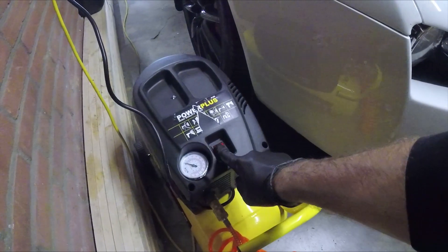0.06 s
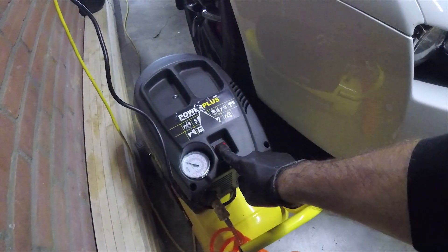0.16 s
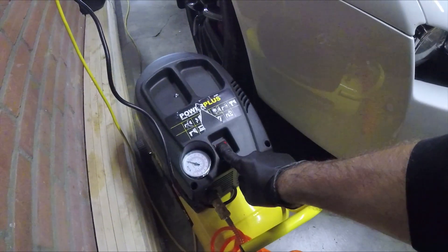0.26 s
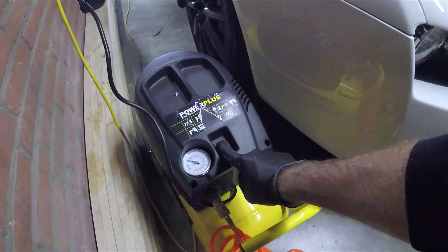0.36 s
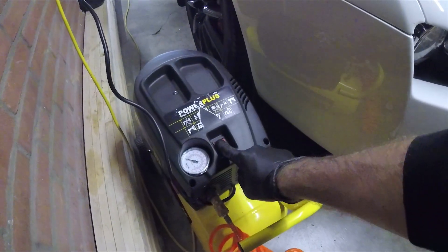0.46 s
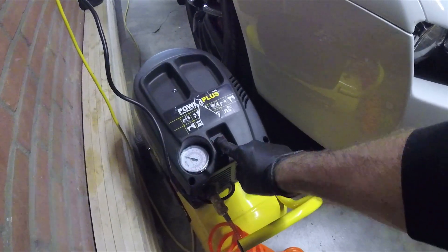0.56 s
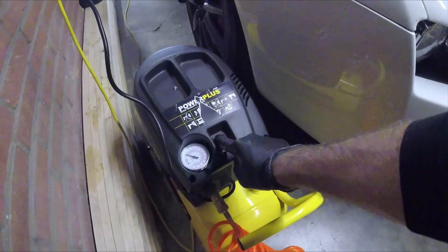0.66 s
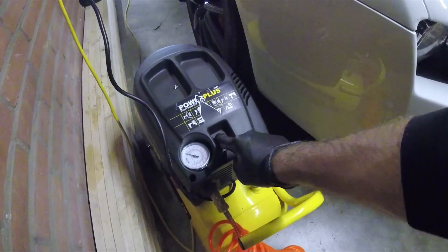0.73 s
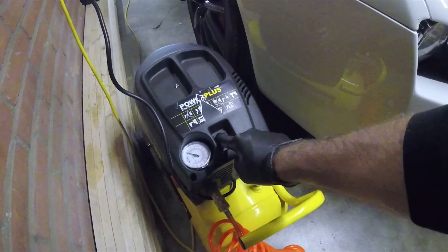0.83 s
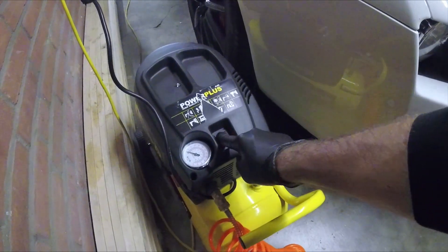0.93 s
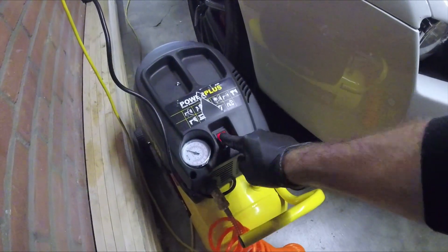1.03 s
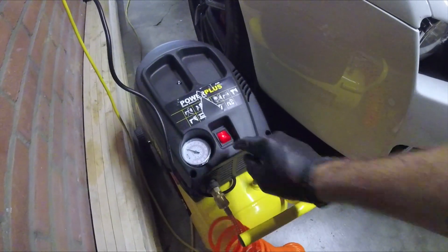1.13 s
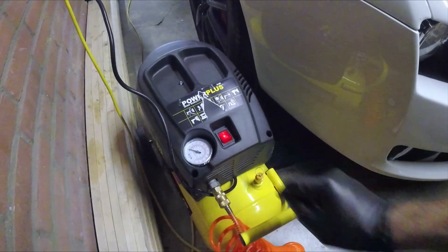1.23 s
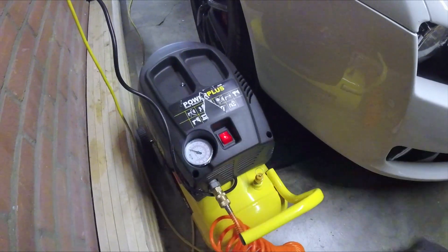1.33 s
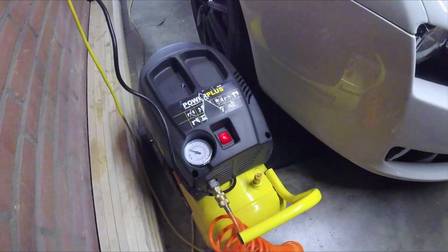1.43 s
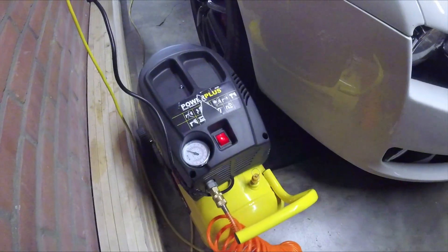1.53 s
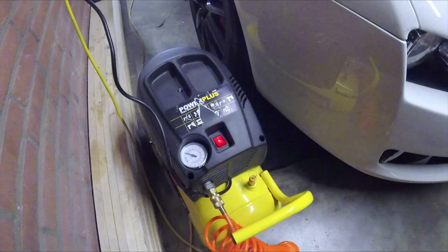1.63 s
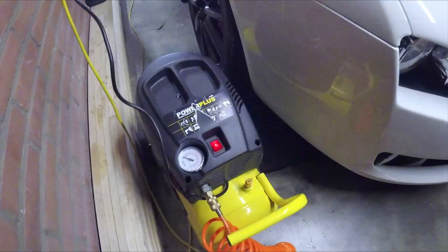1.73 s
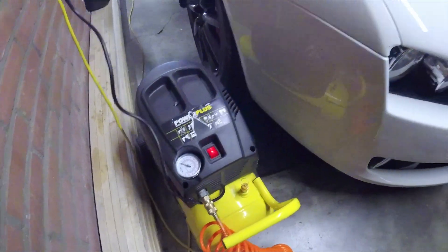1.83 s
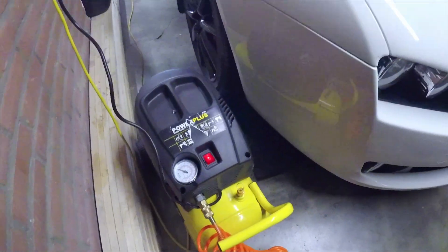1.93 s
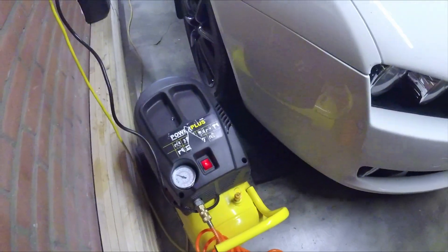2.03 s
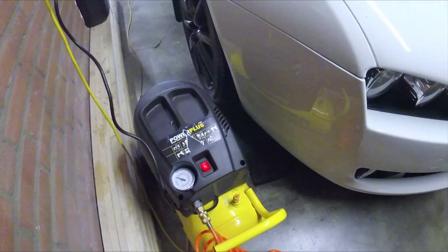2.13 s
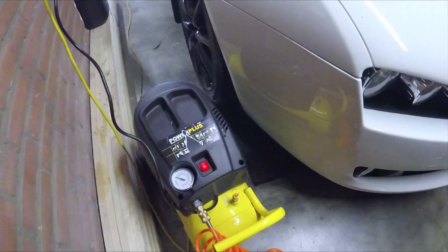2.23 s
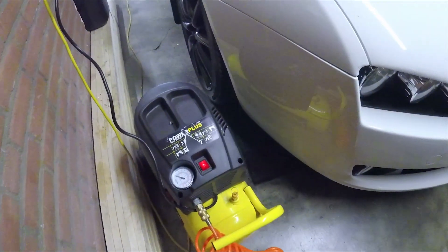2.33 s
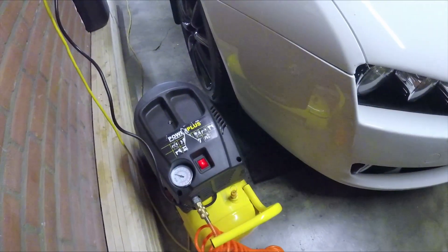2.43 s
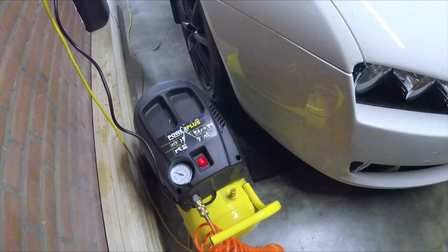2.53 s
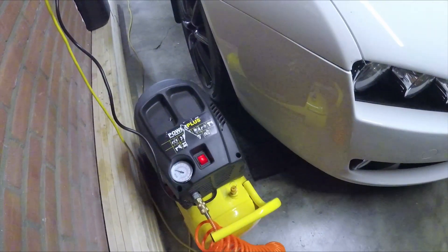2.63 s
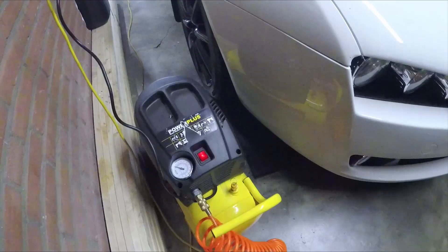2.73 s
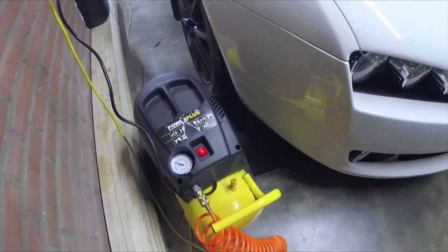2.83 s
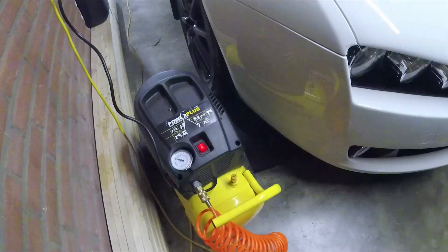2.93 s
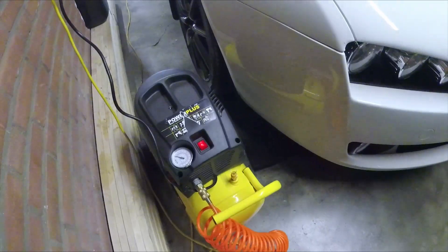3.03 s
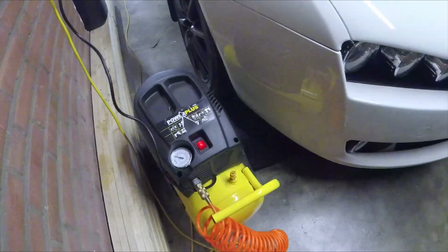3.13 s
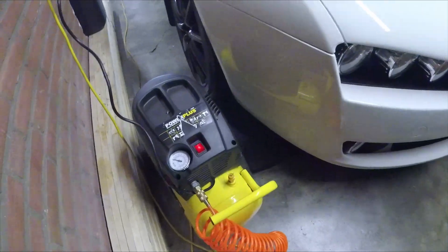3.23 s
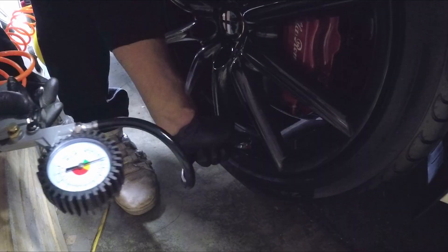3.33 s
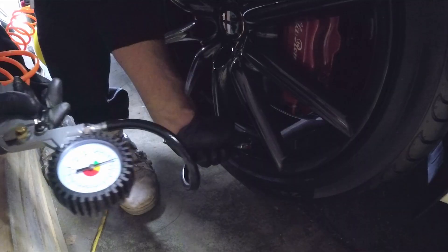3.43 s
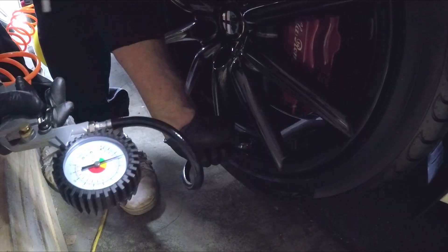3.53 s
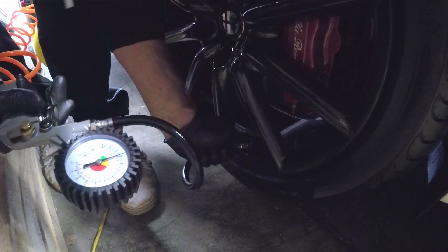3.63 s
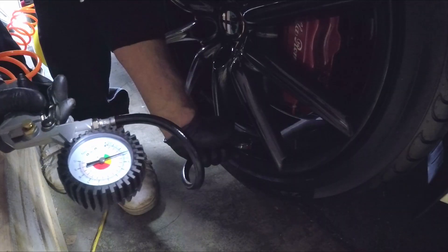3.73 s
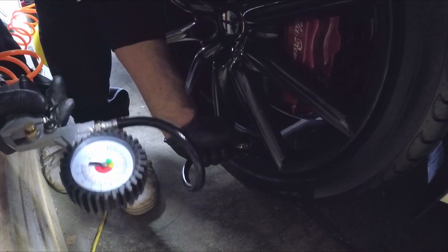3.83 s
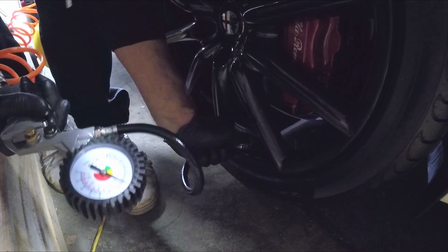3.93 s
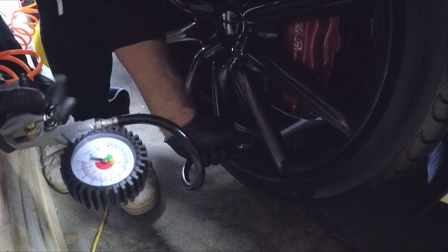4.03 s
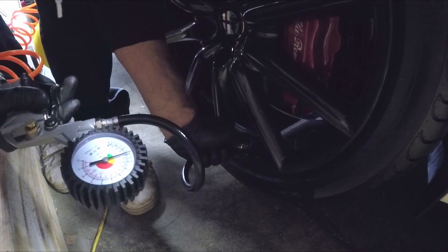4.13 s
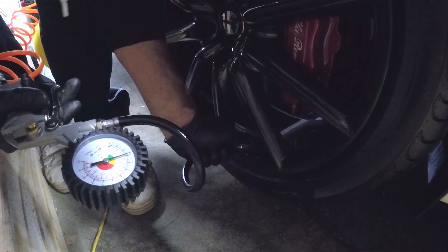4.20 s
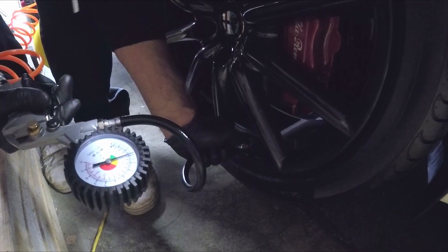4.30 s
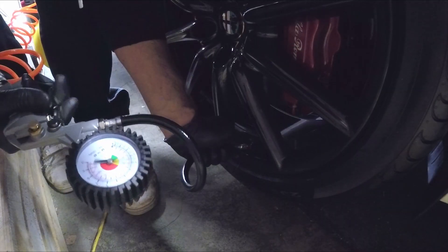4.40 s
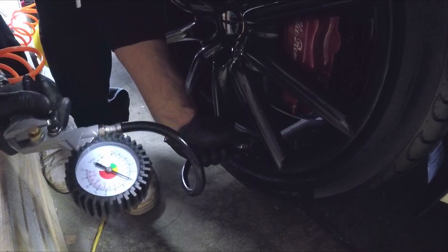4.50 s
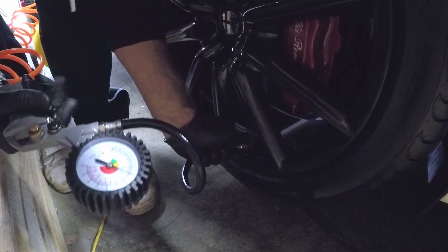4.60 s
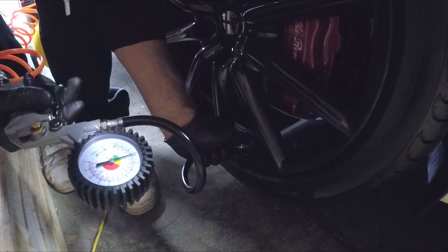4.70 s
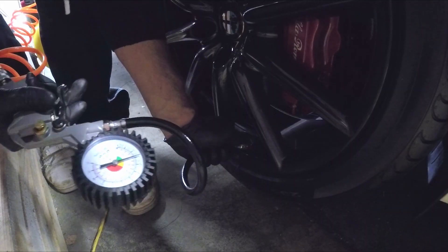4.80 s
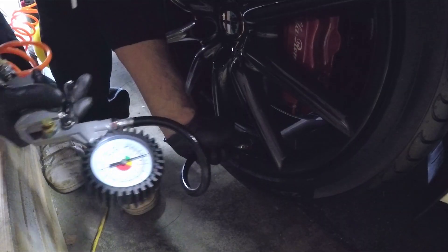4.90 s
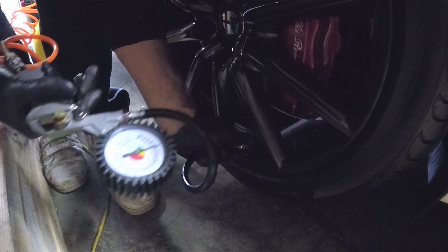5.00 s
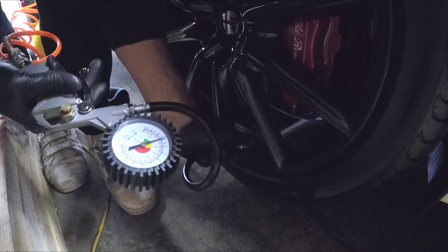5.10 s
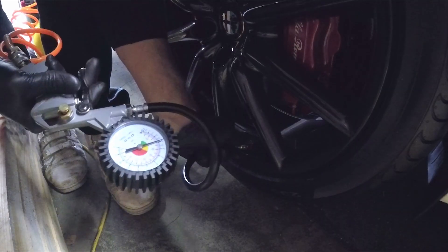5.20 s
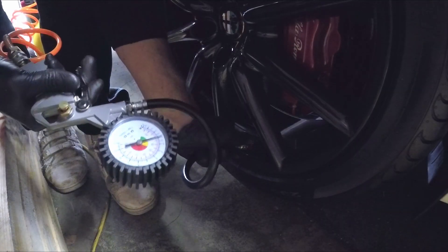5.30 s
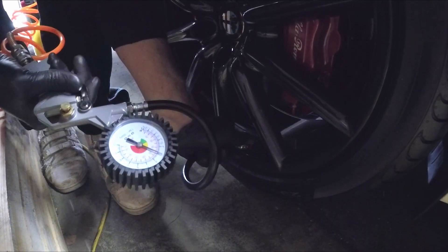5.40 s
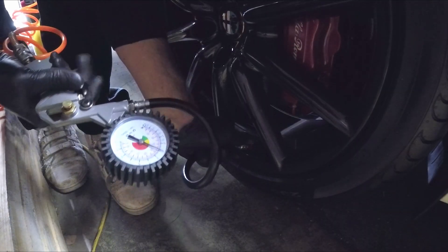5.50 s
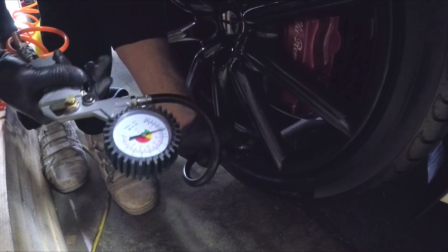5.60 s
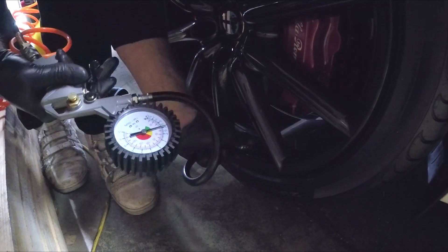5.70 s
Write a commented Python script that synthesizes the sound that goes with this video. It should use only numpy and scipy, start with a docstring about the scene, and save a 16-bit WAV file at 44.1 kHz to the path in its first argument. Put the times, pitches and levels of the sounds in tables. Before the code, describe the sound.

A quiet garage, heard from close up. Faint clicks come at about 0.2 and 0.4 seconds, then a sharp switch click at 0.55. A small piston air compressor spins up at once with a brief crackle, a chirp and an uneven rattle. By 1 second it settles into a loud, steady, buzzing drone with rapid thumping, whirring gears, rushing fan air and a thin, very high squeal. At about 3.4 seconds it cuts off abruptly, without winding down, leaving faint room tone. At 3.8 a tyre inflator gives a sharp click and a dull knock. Three short hisses of air go into the tyre, at about 3.8, 4.4 and 5.3 seconds, each lasting roughly a quarter of a second. They are much quieter than the compressor, bright and slightly ringing, with light knocks. The last two end in a faint whistle, and a soft handling rumble closes the sound.

```python
"""A switch clicks in a quiet garage and a small piston air compressor spins up: the piston thumps, the
intake reed flutters on each suction stroke, the outlet valve knocks and squeals, gears and fan buzz.
The scene changes abruptly to the wheel of a car, where an inflator knocks, clicks and lets three short
blasts of air into the tyre. The jet hisses at the valve and sets the tyre's cavity ringing."""
import sys
import numpy as np
from scipy import signal
from scipy.fft import rfft, irfft
from scipy.io import wavfile

SR = 44100
rng = np.random.default_rng(int(sys.argv[2]) if len(sys.argv) > 2 else 0)


def digitize_waveform(pressure):
    """Quantize a signal to 16-bit integers and store it at the path in sys.argv[1].

    Rows of a 2-D input are taken as channels; values are limited to [-1, 1].
    """
    field = np.atleast_2d(pressure).T
    bounded = np.clip(field, -1, 1)
    quanta = np.round(bounded * 32767).astype(np.int16)
    wavfile.write(sys.argv[1], SR, quanta)


N = 253575
TIME = np.arange(N) / SR
POWER_S, START_S, CHANGE_S = .553, .603, 3.366  # power comes on, crank breaks free, cut to the wheel
LOAD_S, LOAD_WIDTH_S = .85, .1  # the piston takes up its load: middle, half length
TOP_SPEED = 65.175  # crank turns per second


def from_db(db):
    """Decibels to gain."""
    return 10 ** (np.asarray(db) / 20)


def unit_rms(x):
    """Scale to rms 1."""
    return x / np.sqrt(np.mean(x ** 2) + 1e-20)


def swell(s, width):
    """A smooth hump of height 1 around a moment."""
    return np.exp(-((TIME - s) / width) ** 2)


def drift(rate_hz):
    """A smooth random wander, rms 1."""
    slow = signal.sosfilt(signal.butter(2, rate_hz, fs=SR, output="sos"), rng.standard_normal(N + SR))
    return unit_rms(slow[SR:])


def noise(spectrum):
    """Steady noise with the given power per Hz."""
    hz, level_db = np.transpose(spectrum)
    bins = np.maximum(np.arange(N // 2 + 1) * SR / N, 1)
    gain = from_db(np.interp(np.log(bins), np.log(hz), level_db))
    return irfft(rfft(rng.standard_normal(N)) * gain, N) * np.sqrt(SR / 2)


def ring(x, hz, t60):
    """One mode: a unit click sets a sine of height 1 ringing."""
    decay, step = from_db(-60 / (t60 * SR)), 2 * np.pi * hz / SR
    return signal.lfilter([0, np.sin(step)], [1, -2 * decay * np.cos(step), decay * decay], x + 1e-18)


def narrow_noise(hz, width_hz):
    """Turbulence in one resonance, rms 1."""
    return unit_rms(ring(rng.standard_normal(N), hz, np.log(1000) / (np.pi * width_hz)))


def dying_noise(age, t60):
    """White noise that dies away from age 0."""
    return rng.standard_normal(len(age)) * (age >= 0) * np.exp(-np.log(1000) * np.abs(age) / t60)


def hollow(x, t60, wet):
    """A share of the sound rings on in the dense modes of a closed space."""
    tail = dying_noise(TIME[:SR // 2], t60)
    reverb = signal.fftconvolve(x, tail / np.linalg.norm(tail))[:N]
    return np.sqrt(1 - wet) * x + np.sqrt(wet) * reverb


def gate(turns, opens, length, edge):
    """1 while a valve is open; all arguments in turns of the crank."""
    into = (turns - opens) % 1
    return np.clip(np.minimum(into, length - into) / edge, 0, 1)


def crank_tones(turns, harmonics, peak_at, scatter, smear):
    """Harmonics that crest near one crank angle; the housing smears the crest and each phase wanders."""
    middle = round(harmonics[len(harmonics) // 2][0])
    out = 0
    for k, level_db in harmonics:
        phase = 2 * np.pi * k * (turns - peak_at) - smear * (k - middle) ** 2
        out += np.sqrt(2) * from_db(level_db) * np.cos(phase + scatter * drift(12))
    return out


# Room tone by the compressor (frequency [Hz], level [dB per Hz])
GARAGE_TONE = [(20, -70), (50, -80), (95, -88.5), (150, -103), (300, -110), (700, -117), (3000, -121),
               (8000, -127), (14000, -133)]
def garage_ambience():
    """A steady, dark bed of noise."""
    return noise(GARAGE_TONE)


# Room tone at the wheel (frequency [Hz], level [dB per Hz])
WHEEL_TONE = [(100, -104), (300, -108), (1200, -111), (5000, -118), (14000, -121)]
# Handling rumble at rest (frequency [Hz], level [dB per Hz])
RUMBLE = [(20, -87), (90, -95.5), (220, -105), (600, -122), (2000, -150)]
def wheel_ambience():
    """Faint air over a low rumble that swells once as the inflator is moved."""
    rumble_db = 9.5 * swell(5.57, width=.099)
    return noise(WHEEL_TONE) + from_db(rumble_db) * noise(RUMBLE)


# Switch pings; knocks of housing, hose and gauge (time [s], pitch [Hz], level [dB], t60 [s])
KNOCK_CUES = [(.217, 2700, -69, 0.067), (.217, 4600, -71, 0.061), (.393, 580, -73, .35),
              (.393, 655.6, -74.5, 0.35), (3.787, 101, -47.5, 0.082), (3.794, 260, -54, 0.032),
              (3.9, 596, -47, 0.019), (4.331, 740, -68.5, .1), (4.437, 575, -45.5, 0.021),
              (5.249, 754, -69, 0.11), (5.403, 600, -44.5, 0.025)]
def knocks():
    """Cushioned hits, each ringing at one pitch."""
    out = np.zeros(N)
    for s, hz, level_db, t60 in KNOCK_CUES:
        age = np.maximum(TIME - s, 0)
        envelope = np.clip(age / .002, 0, 1) * from_db(-60 * age / t60)
        out += from_db(level_db) * envelope * np.sin(2 * np.pi * hz * age)
    return out


# Switch clicks; the inflator's puff as it seals
# (time [s], pre-filter level [dB], attack [s], t60 [s], top of band [Hz])
CLICK_CUES = [(.216, -63, .001, .035, 6000), (.391, -44, 0.0012, 0.065, 3500),
              (.528, -66, .001, 0.024, 12000), (0.5504, -25, 0.0018, 0.037, 12160),
              (3.786, -40, 0.0036, 0.034, 12000), (3.79, -31, 0.006, 0.027, 12400)]
def clicks():
    """Sharp, bright bursts of noise with a faint room tail."""
    out = np.zeros(N)
    for s, level_db, attack, t60, top_hz in CLICK_CUES:
        age = TIME - s
        burst = (dying_noise(age, t60) + .03 * dying_noise(age, t60=.25)) * np.clip(age / attack, 0, 1)
        band = signal.butter(2, [1700, top_hz], "band", fs=SR, output="sos")
        out += from_db(level_db) * signal.sosfilt(band, burst)
    return out


# Short whistles (time [s], pitch [Hz], peak level [dB], width [s])
WHISTLE_CUES = [(.673, 2823, -32.5, 0.0071), (4.61, 2550, -55.5, 0.037), (5.53, 2805, -53.5, 0.025)]
def whistles():
    """The starting drive and the closing air valve give near-pure tones that swell and fade."""
    out = np.zeros(N)
    for s, hz, level_db, width in WHISTLE_CUES:
        envelope = 1 / np.cosh(np.clip((TIME - s) / width, -20, 20))
        out += from_db(level_db) * envelope * np.sin(2 * np.pi * hz * TIME + .3 * drift(30))
    return out


# Trigger squeezes (time [s], length [s], relative level [dB], attack [s], release [s])
BLAST_CUES = [(3.815, 0.28, -45, 0.031, 0.015), (4.392, 0.27, -44.5, 0.025, 0.021),
              (5.316, 0.26, -43.5, 0.031, 0.019)]
def air_flow():
    """With each squeeze the flow builds up, holds and is shut off."""
    lead_s, shut_early_s = .029, .038  # the valve cracks open early and is half shut before the end
    trim_db = -9.5
    flow = np.zeros(N)
    for s, length, level_db, attack, release in BLAST_CUES:
        opening = (1 - np.exp(-np.maximum(TIME - s + lead_s, 0) / attack)) ** 2
        closing = .5 - .5 * np.tanh((TIME - s - length + shut_early_s) / (2 * release))
        flow += from_db(level_db + trim_db) * opening * closing
    return flow


# Hiss of the jet (frequency [Hz], level relative to the flow [dB per Hz])
JET_COLOUR = [(300, -53), (1700, -49), (2300, -38), (2950, -33.5), (3800, -35.5), (5300, -34),
              (6300, -33.5), (7300, -26), (8700, -31.5), (9500, -36), (11000, -37), (11900, -32.5),
              (12500, -37), (13800, -35), (15000, -41)]
# Strongest modes of the tyre cavity (pitch [Hz], level relative to the flow [dB])
TYRE_MODES = [(2540, -16), (2842, -5.5), (2993, -4), (3229, -8.5), (3359, -24.5), (4608, -19),
              (5146, -10.5), (5598, -11), (7310, 2), (7748, -7), (7902, 0), (8228, -13), (8333, -1.5),
              (8591, -6), (8742, -5), (9173, -8), (9862, -30), (11541, -20), (12058, -15), (13910, -21)]
def inflator():
    """A jet of air hisses at the valve and excites the tyre cavity; high modes die sooner."""
    flow = air_flow()
    jet = flow * noise(JET_COLOUR)
    lingering = signal.sosfilt(signal.butter(2, [2500, 5500], "band", fs=SR, output="sos"), jet)
    hiss = hollow(jet, t60=.15, wet=.8) + .36 * hollow(lingering, t60=.43, wet=1)
    for hz, level_db in TYRE_MODES:
        t60 = .36 * np.sqrt(2800 / hz)
        unity_gain = np.sqrt(4 * np.log(1000) / (t60 * SR))
        hiss += from_db(level_db) * unity_gain * ring(flow * rng.standard_normal(N), hz, t60)
    return hiss


# Fan and rushing air (frequency [Hz], relative level [dB per Hz])
FAN_COLOUR = [(20, -84.5), (100, -75), (310, -75.5), (420, -65), (680, -63.5), (820, -70.5), (1100, -68),
              (1370, -65.5), (1850, -72.5), (3700, -72), (5200, -79), (8500, -78.5), (10200, -86),
              (14500, -88.5)]
def fan_rush(turns):
    """Air rushes hardest during suction, and is faint while the motor strains at the resting crank."""
    suction = gate(turns, opens=0, length=.63, edge=.18) - .5
    stall_db = np.interp(TIME, [POWER_S, START_S], [-15.5, 0])
    rush = noise(FAN_COLOUR) * from_db(.5 + stall_db + .6 * drift(150) + .69 * suction)
    return (TIME >= POWER_S) * rush


def brush_crackle(pace):
    """The brushes crackle under the inrush of current until the motor is up to speed."""
    inrush = (TIME >= START_S) * (1 - pace)
    return from_db(-30.5) * inrush * narrow_noise(3200, width_hz=2200) * from_db(3 * drift(200))


def motor(turns, speed):
    """The shaft hums; the commutator's whine flares as it passes a sharp resonance of the housing."""
    gear_ratio, bars = 57 / 12, 12  # shaft turns per crank turn, commutator bars
    resonance_hz, half_width_hz = 3668, 14
    shaft_angle = 2 * np.pi * gear_ratio * turns
    whine_hz = bars * gear_ratio * speed
    resonance = 1 / np.hypot(1, (whine_hz - resonance_hz) / half_width_hz)
    whine = from_db(-43) * resonance * np.sin(bars * shaft_angle + .5 * drift(28))
    hum = from_db(-49.5) * np.sin(shaft_angle)
    return np.sqrt(2) * (hum + whine)


# Gear buzz (crank harmonic, level at top speed [dB rms])
GEAR_TONES = [(17, -59.5), (18, -60.5), (19, -48), (20, -52.5), (21, -46.5), (22, -57), (23, -47.5),
              (28, -50), (30, -53.5), (32, -61.5), (49, -62), (50, -64.5)]
def gear_buzz(turns, pace):
    """The gears rattle harder as they gain speed."""
    return pace * crank_tones(turns, GEAR_TONES, peak_at=.07, scatter=.45, smear=.3)


# Fader curve of the squeal (time [s], relative level [dB])
SQUEAL_FADER = [(0.68, -49), (0.71, -51.5), (0.89, -41.5), (1.52, -44.5), (1.81, -40.5), (3.0, -38.5),
                (3.04, -41.5), (3.34, -41)]
def outlet_squeal(turns):
    """Air hisses as the outlet valve opens and rebounds; rising pressure locks it into a whistle."""
    lock_s = (1.45, 1.7)  # over this span the whistle takes over and its pitch drops
    whistle_share = np.interp(TIME, lock_s, [.3, .72])
    cycles = np.cumsum(np.interp(TIME, lock_s, [13420, 13280])) / SR
    whistle = np.sqrt(2) * np.sin(2 * np.pi * cycles + 1.5 * drift(70)) * from_db(drift(60))
    air = unit_rms(narrow_noise(13300, width_hz=1000) + .6 * narrow_noise(14000, width_hz=500))
    squeal = np.sqrt(whistle_share) * whistle + np.sqrt(1 - whistle_share) * air
    opening = gate(turns, opens=.65, length=.3, edge=.04)
    rebound = .46 * gate(turns, opens=.93, length=.34, edge=.068)
    level_db = np.interp(TIME, *np.transpose(SQUEAL_FADER)) + 1.1
    fade_in = np.clip((TIME - START_S) / .12, 0, 1)
    return from_db(level_db) * fade_in * unit_rms((opening + rebound + .13) * squeal)


# Outlet valve's knock (crank harmonic, level at top speed [dB rms])
OUTLET_TONES = [(10, -48), (11, -45), (12, -42), (13, -42.5), (14, -39.5), (15, -45), (16, -42.5)]
def outlet_knock(turns, pace, slap):
    """The valve knocks once a turn, harder with speed and with a lift while the reed still slaps."""
    return pace * from_db(3 * slap) * crank_tones(turns, OUTLET_TONES, peak_at=.67, scatter=.2, smear=.14)


# Piston thump (crank harmonic, level at top speed [dB rms])
PISTON_TONES = [(1, -31.5), (2, -35), (3, -43.5), (4, -35.5)]
def piston(turns, pace):
    """The piston thumps harder with speed; as the load comes on, the machine rocks once a turn."""
    peak_at = .15  # turns
    rocking = from_db(-30) * swell(LOAD_S, LOAD_WIDTH_S) * np.cos(2 * np.pi * (turns - peak_at))
    return rocking + pace ** 1.7 * crank_tones(turns, PISTON_TONES, peak_at, scatter=.025, smear=0)


def intake_reed(turns, speed, slap):
    """The reed flutters afresh on each suction stroke; early on it slaps its seat unevenly."""
    flutter_hz = 425.2 - 45 * (1 - speed / TOP_SPEED)
    stroke = np.clip(turns, 0, None).astype(int)
    detune, strength = rng.standard_normal((stroke.max() + 1, 2))[stroke].T
    stroke_age = (turns % 1) / speed
    wobble = (.03 + .22 * slap) * drift(120)
    angle = 2 * np.pi * flutter_hz * (1 + .028 * slap * detune) * stroke_age - 3.45 + wobble
    overtones = slap * (.76 * np.sin(1.83 * angle) + .3 * np.cos(2.74 * angle))
    rasp = .35 * narrow_noise(920, width_hz=540)
    swing = np.cos(angle) + slap * (overtones + rasp)
    level_db = -22.5 + (.65 * slap - .13) * strength
    return from_db(level_db) * swing * gate(turns, opens=0, length=.81 - .13 * slap, edge=.063)


def crank_speed():
    """Turns per second: the motor spins up, sags as the load comes on and creeps to its top speed."""
    age = np.maximum(TIME - START_S, 0)
    spin_up = 30.4 * np.exp(-age / .0713)
    creep = 3.57 * np.exp(-age / .56)
    sag = 2.02 * swell(LOAD_S, LOAD_WIDTH_S)
    return TOP_SPEED - spin_up - creep - sag


def compressor():
    """The crank drives every layer; fan and brushes ring in the housing."""
    speed = crank_speed()
    pace = speed / TOP_SPEED
    running = TIME >= START_S
    turns = np.cumsum(speed * running) / SR + .0012 * drift(20)
    slap = .5 - .5 * np.tanh((TIME - .87) / .134)  # falls from 1 to 0 as back pressure settles the reed
    pump = piston(turns, pace) + intake_reed(turns, speed, slap) + outlet_knock(turns, pace, slap)
    drive = gear_buzz(turns, pace) + motor(turns, speed)
    housing = hollow(fan_rush(turns) + brush_crackle(pace), t60=.079, wet=.14)
    return running * (pump + drive + outlet_squeal(turns)) + housing


def scene():
    """First the compressor, then a hard cut to the quiet at the wheel."""
    before_cut = np.clip((CHANGE_S - TIME) / .001, 0, 1)
    by_compressor = before_cut * (compressor() + garage_ambience())
    by_wheel = (1 - before_cut) * (inflator() + wheel_ambience())
    return (by_compressor + by_wheel + clicks() + knocks() + whistles())[None]


def record(dry):
    """A steep low-pass takes off the very top."""
    return signal.sosfilt(signal.ellip(12, .1, 80, 15250, fs=SR, output="sos"), dry)


dry = scene()
out = record(dry)
digitize_waveform(out)
```